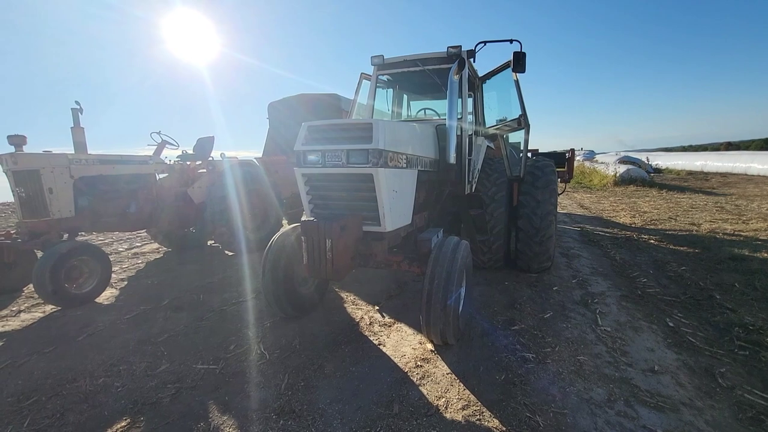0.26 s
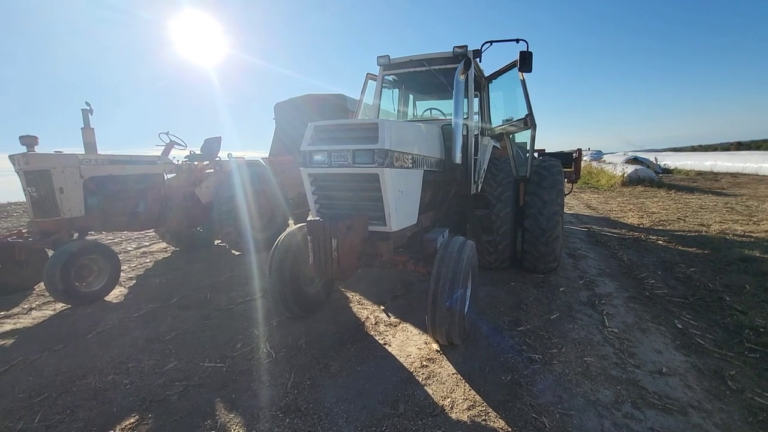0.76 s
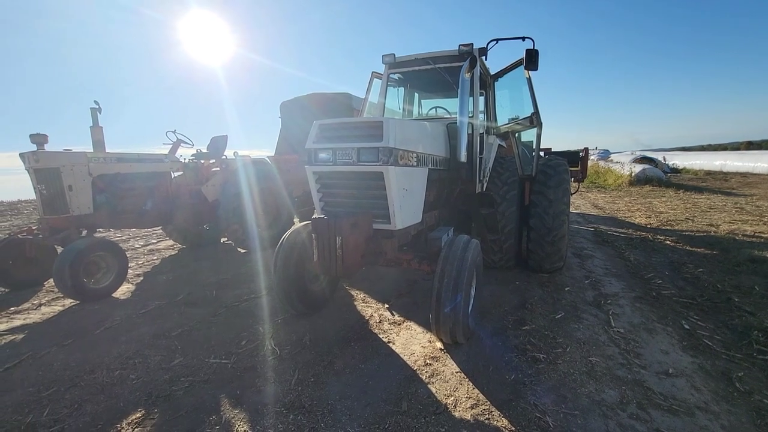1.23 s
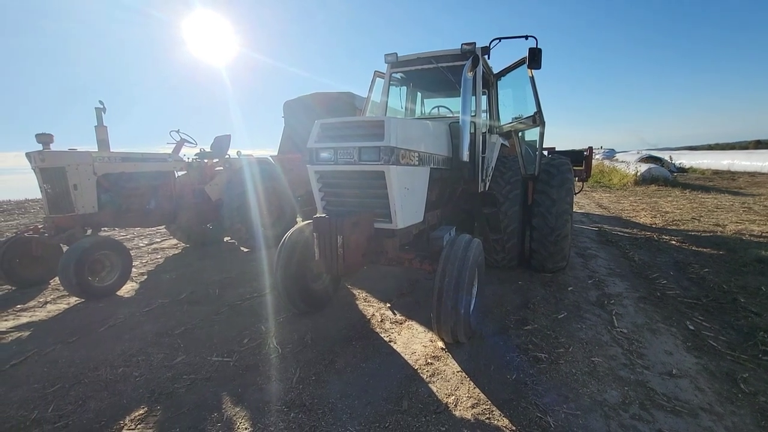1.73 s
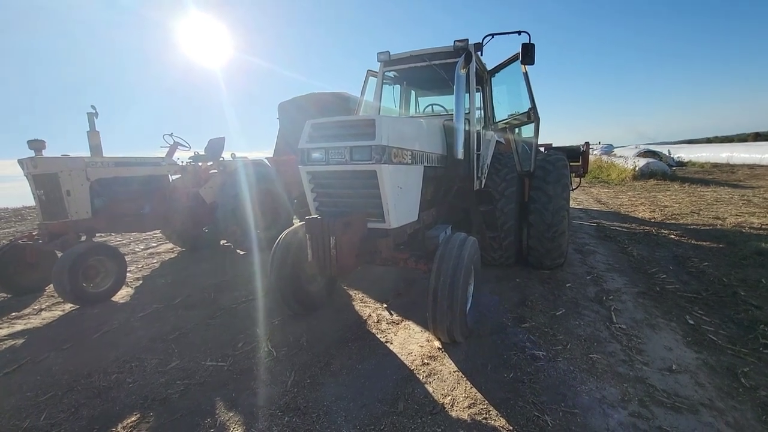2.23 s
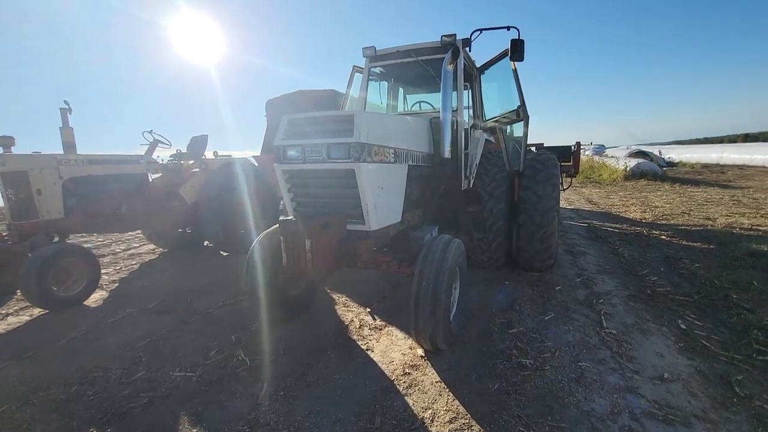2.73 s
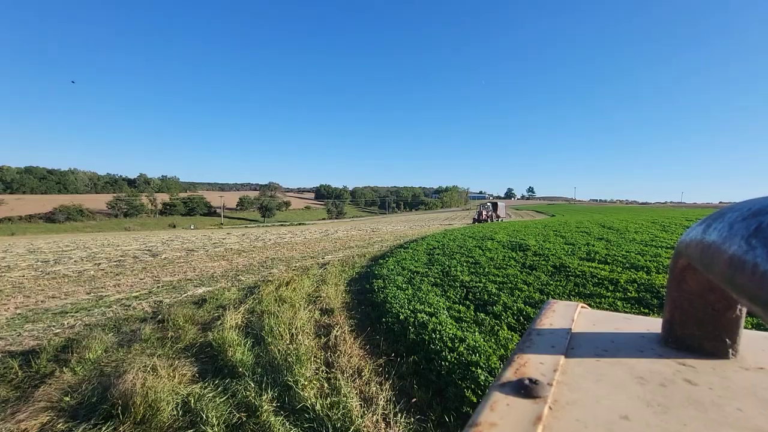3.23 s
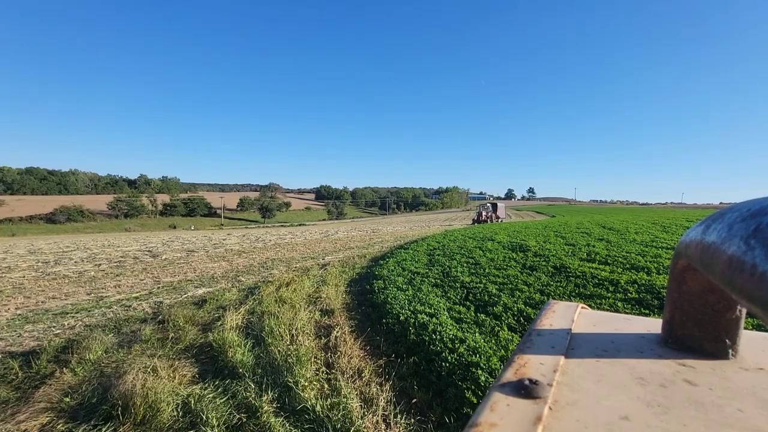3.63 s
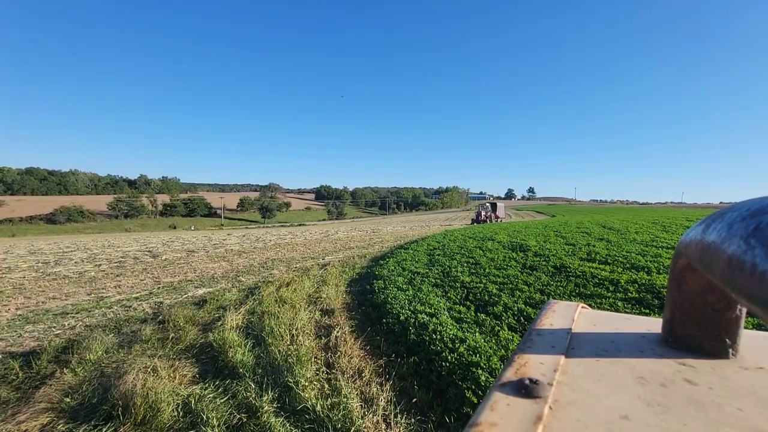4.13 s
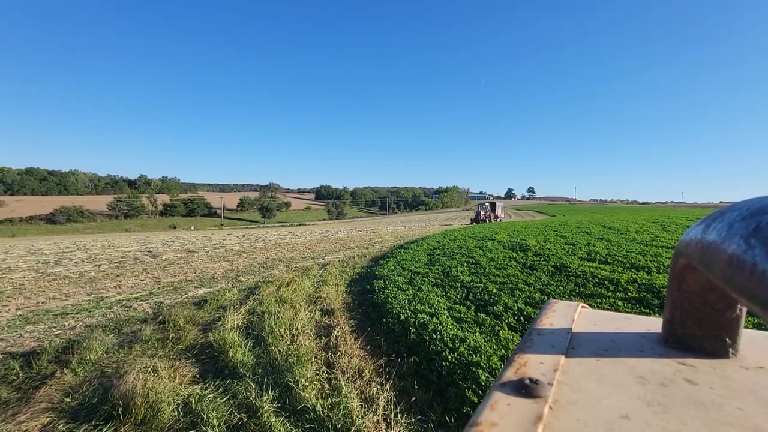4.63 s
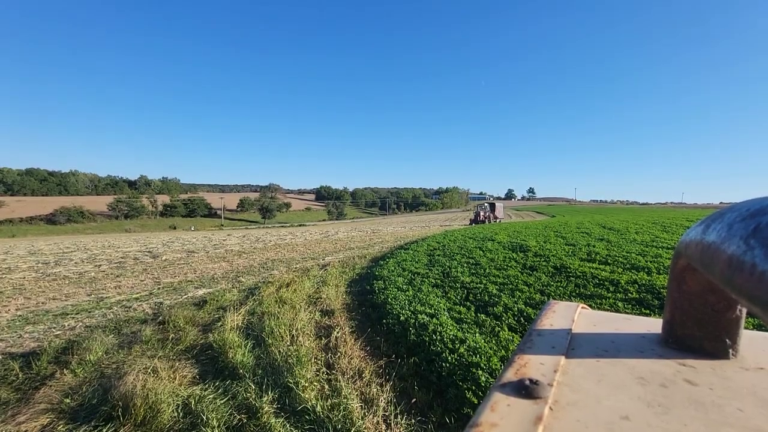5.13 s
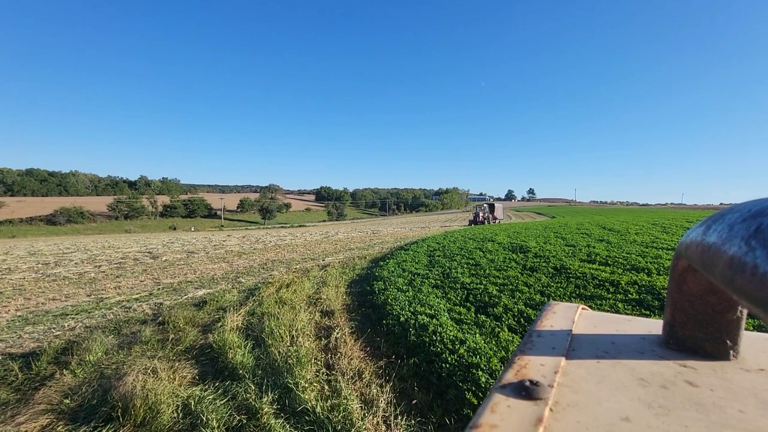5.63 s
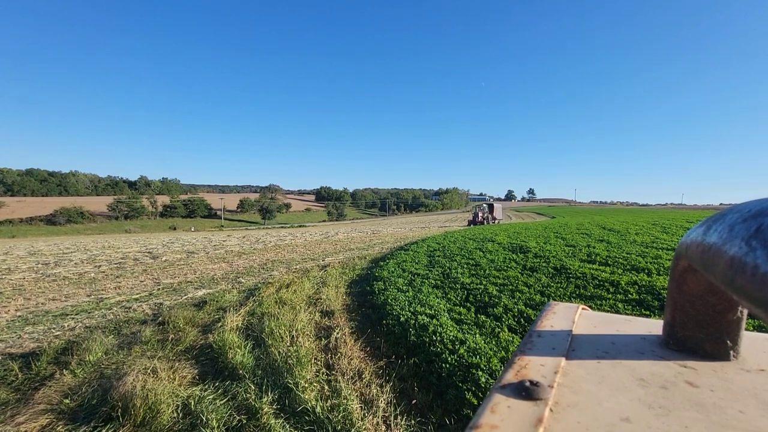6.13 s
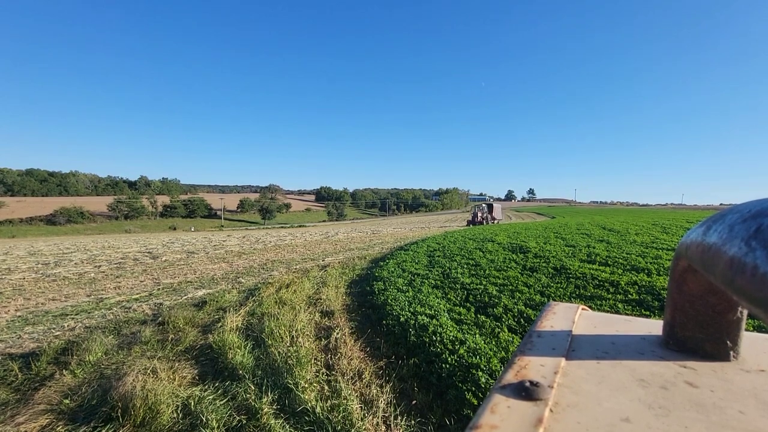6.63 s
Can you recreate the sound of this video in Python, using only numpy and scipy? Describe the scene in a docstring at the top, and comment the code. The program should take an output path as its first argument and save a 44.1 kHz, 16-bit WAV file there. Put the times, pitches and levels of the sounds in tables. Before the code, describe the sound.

In an open farmyard, a six-cylinder diesel tractor runs hard, its firings merged into a thick drone with dense metallic clatter, beside a crop blower's low paddle hum and airy rush. At about three seconds it cuts to a tiny silence, then a field: a close diesel idles with separate knocks, ticking injectors and fan noise, while a far forage chopper hums low. Wide stereo, close microphone, dry outdoors.

```python
"""A farmyard, then after a short silence a field. In the yard a six-cylinder diesel tractor at working
speed sums exhaust orders, body drone and clatter, beside a crop blower of paddle hum and rushing noise.
In the field another diesel idles close by: single firings excite body, block and injectors, knocks and
once-a-cycle chirps stand out, and its fan is shaped noise. A far forage chopper is a tone with its octave."""
import sys
import numpy as np
from scipy import signal
from scipy.fft import rfft, irfft, next_fast_len
from scipy.io import wavfile
from scipy.ndimage import map_coordinates

SR = 44100
rng = np.random.default_rng(int(sys.argv[2]) if len(sys.argv) > 2 else 0)


def dump(signal):
    """Clip the signal to [-1, 1] and save it as 16-bit WAV at the path in sys.argv[1]."""
    limited = np.clip(np.atleast_2d(signal).T, -1, 1)
    pcm = np.round(limited * 32767).astype(np.int16)
    wavfile.write(sys.argv[1], SR, pcm)


N = 302526

# When each place is heard: (start [s], end [s])
YARD_SPAN = (-1, 3.026)
FIELD_SPAN = (3.130, 8)

# Crankshaft speed, steady and then creeping up: (time [s], speed [rpm])
WORK_RPM = [(2.4, 1865.3), (3.02, 1870.4)]
IDLE_RPM = [(4.7, 773.9), (6.85, 776.6)]

# Exhaust harmonics: (multiple of the four-stroke cycle rate [1], level [dB])
WORK_ORDERS = [(6, -18), (9, -38), (10, -35), (12, -21), (14, -28), (16, -38.5), (18, -36), (20, -34.5),
               (26, -35.5), (30, -40), (32, -38), (36, -38.5), (52, -36)]
IDLE_ORDERS = [(6, -36), (9, -38), (12, -38), (15, -29.5), (17, -37), (18, -32), (19, -38), (20, -39),
               (21, -35), (24, -41), (31, -39), (38, -41), (40, -42), (51, -41)]

# Spectral envelopes of each source: (frequency [Hz], relative level [dB])
WORK_BODY = [(30, -26), (45, -17), (60, 0), (110, -2), (160, -4), (205, 3), (260, -1), (330, -4),
             (410, 0.5), (560, -7.5), (700, -13.5), (900, -23), (1500, -69)]
WORK_CLATTER = [(380, -37), (650, -13), (702, -18), (797, -6.5), (899, -6), (1030, -10), (1210, -2.5),
                (1320, -6.5), (1440, 0), (1770, -15), (2150, -6), (2390, -8.5), (2600, -18.5),
                (3040, -15.5), (3500, -20.5), (4550, -37), (7700, -120)]
BLOWER_RUSH = [(1760, -19), (3000, -2.5), (3130, -13), (3500, -9.5), (4170, -5.5), (4660, -10.5),
               (6170, -6), (7150, -10.5), (8760, -29), (9870, -33), (14200, -20.5), (15100, -21),
               (16000, -32)]
IDLE_BODY = [(25, -22), (45, -1), (120, 3), (165, -4.5), (200, 0.5), (245, 2), (285, -7.5), (330, -4),
             (400, -11), (600, -7), (900, -26), (1500, -70)]
IDLE_CLATTER = [(320, -31), (550, -5), (739, -2), (888, -4.5), (1060, 0), (1180, -4.5), (1250, 3),
                (1350, -4), (1770, -6), (2310, -18.5), (2570, -13), (3200, -12.5), (4160, -37),
                (7040, -120)]
INJECTORS = [(1530, -44), (2600, -3.5), (2760, -21), (3170, -20), (3470, -5), (3800, -7.5), (5440, 1),
             (6190, -7), (7480, -7.5), (8910, -27), (11600, -22.5), (12500, -18), (15200, -11.5),
             (16000, -22)]
IDLE_FAN = [(30, -21), (100, -5), (450, -3.5), (1200, -5), (2800, -9.5), (4300, -8), (5200, -8),
            (5650, -3.5), (6100, -14), (6800, -17.5), (7400, -12.5), (8800, -59), (15000, -32)]

# Likeness of left and right, held within 0 to 1 in use: (frequency [Hz], correlation [1])
WORK_ALIKE = [(60, 0.6), (300, 1.2), (640, 0.84), (1400, 0.7), (2400, .5), (7000, 0.23), (9500, 1.3),
              (15000, 1)]
IDLE_ALIKE = [(130, 0.52), (300, 1), (700, 0.21), (1500, 0.55), (5000, 0.2), (15000, 0.12)]
# Balance of the channels: (frequency [Hz], left minus right [dB])
WORK_BALANCE = [(300, -2), (1150, 2.5), (1450, -5.5), (1750, -4.5), (2200, -6), (3000, -7.5), (3700, -5),
                (4700, -8.5), (6500, -9), (8500, 1), (11000, 0.5), (14500, -12)]
IDLE_BALANCE = [(250, -2), (420, 2), (680, 0), (850, 3.5), (1200, -2), (1700, -5.5), (2400, -1),
                (3500, -4.5), (5300, -12.5), (7000, 0), (9500, 5), (14500, 10)]
# Phase by which the left channel leads: (frequency [Hz], phase [rad])
WORK_LEAD = [(0, 0), (1290, -0.0), (2500, 8.5), (3530, 15), (4050, 12.5), (5080, 17), (7670, 18.9),
             (16000, 18.8)]
IDLE_LEAD = [(0, 0), (1460, 4), (5170, 16.2), (8610, 30.5), (11300, 31.5), (13000, 42.6), (15000, 53.2),
             (16000, 55.5)]

# Panels and linkages sounding once a cycle: (moment [cycles], length [cycles], centre [Hz],
# width [Hz], level [dB], left minus right [dB])
WORK_PARTS = [(.03, 0.03, 430, 80, -24.5, 0), (.15, 0.088, 249, 35, -24.5, -3.5),
              (.5, 0.035, 1420, 130, -22.5, -13.5), (.86, 0.029, 2164, 200, -23, -12.5),
              (0.971, 0.059, 1170, 90, -22, -2.5)]
IDLE_PARTS = [(.05, 0.037, 703, 71, -30.5, -8.5), (.29, 0.014, 1120, 130, -17.5, -2.5),
              (.37, 0.012, 1780, 200, -25.5, -5), (.415, .016, 1100, 120, -24, -4),
              (.54, 0.044, 433, 90.5, -29, 6), (.7, 0.052, 335, 40.3, -27.5, 3),
              (.75, .045, 780, 55, -19, -1), (.855, 0.015, 4730, 170, -23, -15),
              (.87, 0.029, 5410, 200, -24, -9.5), (.94, .02, 1150, 120, -26, -4.5)]

# Crop blower: (time [s], rush level before gain [dB], paddle rate [Hz], hum level [dB])
BLOWER_COURSE = [(0, -28, 62.9, -23), (1.8, -28.5, 62.5, -25), (2.6, -27.5, 63.4, -23.5),
                 (3, -27, 63.2, -22.5)]

# Idling cylinders in firing order: (combustion [dB], injector [dB], injector t60 [s])
CYLINDERS = [(0.5, 2, 0.12), (0, 1.5, 0.16), (2, -0.5, 0.16), (-1.5, 5, .06), (2, 3.5, 0.25),
             (-2, -0.5, 0.14)]
# Ringing modes of the engine block: (frequency [Hz], relative level [dB], t60 [s])
BLOCK_MODES = [(790, -7, .06), (1060, -2, .06), (1280, -3, .05), (1470, -3, .04), (1690, 0, .04),
               (1830, -1, .045), (2090, -4, .04)]
# Two opposite knocking cylinders: (moment [cycles], level before a fixed cut [dB])
KNOCKERS = [(.195, -13), (.692, -23.5)]
# Charges that burn late and knock harder: (time [s], extra level [dB])
HARD_BURNS = [(4.265, 4.5), (4.496, 11), (5.272, 10.5), (6.279, 4.5)]

# Firing note of the far chopper, sagging as it takes on crop: (time [s], pitch [Hz])
CHOPPER_PITCH = [(3.15, 102.9), (4.23, 102.9), (4.33, 101.5), (6.85, 101.6)]

IDLE_LAG_S = .0005  # right channel behind left, for the knocks and once-a-cycle parts
KNOCK_SCATTER_DB = 1.6  # spread of ordinary knocks
CRACK_T60_S = 0.028  # noisy edge of a knock
SLAP_DELAY_S, SLAP_DB = 0.016, -15  # nominal delay of the piston slap, level relative to its knock
CHOPPER_DB, OCTAVE_DB = -19, -24.5  # mean level, and octave relative to the firing note
AIR_SWELL_DB, AIR_KNOTS_PER_S = 1.5, 7  # swelling in the moving air
TOP_HZ = 15950  # upper band limit


def amp(db):
    """Amplitude ratio: twenty decibels per factor of ten."""
    return 10 ** (np.asarray(db) / 20)


def unit(x):
    """Normalization to a root-mean-square value of 1."""
    return x / np.sqrt(np.mean(x ** 2) + 1e-20)


def along(points, hz):
    """Interpolation of a spectral table along a logarithmic frequency axis."""
    f, v = np.transpose(points)
    return np.interp(np.log(hz + 1), np.log(f + 1), v)


def curves(rows):
    """Linear interpolation in time, giving one curve for each column after the first."""
    s, *cols = np.transpose(rows)
    return [np.interp(np.arange(N) / SR, s, c) for c in cols]


def wobble(rate):
    """Slow random modulation: a smooth curve through random knots, rate of them a second."""
    knots = rng.standard_normal(int(N * rate / SR) + 4)
    return map_coordinates(knots, [np.arange(N) * rate / SR])


def filtered(x, response):
    """Linear filtering: the spectrum is multiplied by a frequency response."""
    m = next_fast_len(N + SR // 4)
    return irfft(rfft(x, m) * response(np.fft.rfftfreq(m, 1 / SR)), m)[..., :N]


def placed(pair, spectrum, alike, balance, lead):
    """Stereo placement: sum and difference of two unrelated signals set the correlation of the ears."""
    m = next_fast_len(N + SR // 4)
    hz = np.fft.rfftfreq(m, 1 / SR)
    turn = np.arccos(np.clip(along(alike, hz), 0, 1)) / 2
    coloured = rfft(pair, m) * amp(along(spectrum, hz))
    mid, side = coloured * [np.ones_like(hz), np.tan(turn)]
    lean = amp(np.outer([.5, -.5], along(balance, hz)))
    lean = lean / np.hypot(*lean)  # equal total power at every balance
    phase = np.exp(1j * np.outer([.5, -.5], np.interp(hz, *np.transpose(lead))))
    ears = irfft(np.array([mid + side, mid - side]) * lean * phase, m)[:, :N]
    return unit(ears)


def cycles(rpm, start):
    """Four-stroke kinematics: one cycle per two crankshaft turns, counted from the time start."""
    count = np.cumsum(curves(rpm)[0]) / (2 * 60 * SR)
    return count - count[round(start * SR)]


def passes(cycle, moment):
    """Phase crossings: the samples at which the engine passes a given moment of its cycle."""
    return np.flatnonzero(np.diff(np.floor(cycle - moment)))


def exhaust(cycle, orders, waver_db):
    """Harmonic radiation of the exhaust pipe: wavering sinusoids locked to the crankshaft."""
    notes = np.zeros(N)
    for order, db in orders:
        level = amp(db + waver_db * wobble(5.84))
        phase = 2 * np.pi * (round(order) * cycle + rng.random())
        notes += level * np.sqrt(2) * np.sin(phase)
    return notes


def firings(cycle, level_db, t60, attack, scatter_db):
    """Impulsive excitation: cylinders fire in turn, and the power of their decaying blows adds."""
    t, power = np.arange(SR // 4) / SR, np.zeros(N)
    for k, (db, life) in enumerate(zip(level_db, t60)):
        at = passes(cycle, k / len(level_db))
        blows = np.zeros(N)
        blows[at] = amp(db + scatter_db * rng.standard_normal(len(at))) ** 2
        decay = amp(-60 * t / life) * (1 - np.exp(-t / attack))
        power += signal.oaconvolve(blows, decay ** 2)[:N]
    return unit(np.sqrt(np.abs(power)))


def rattle(cycle, repeat, jitter):
    """Cyclostationary noise: the power share repeat recurs each cycle, its timing wandering by jitter [s]."""
    length = round(N / (cycle[-1] - cycle[0]))
    place = cycle * length + jitter * SR * wobble(80)
    rings = rng.standard_normal((2, length))
    same = [map_coordinates(ring, [place % length], mode="grid-wrap") for ring in rings]
    share = np.clip(repeat, 0, 1)
    return np.sqrt(share) * np.array(same) + np.sqrt(1 - share) * rng.standard_normal((2, N))


def parts(cycle, table, lag):
    """Resonance of panels and linkages: narrow bands buzz or chirp at set moments of every cycle."""
    shake, out = rattle(cycle, repeat=0.76, jitter=.00003)[0], np.zeros((2, N))
    for moment, length, centre_hz, width_hz, db, pan_db in table:
        ring = filtered(shake, lambda hz: np.exp(-.5 * ((hz - centre_hz) / width_hz) ** 2))
        distance = (cycle - moment + .5) % 1 - .5  # from the nearest such moment
        swell = np.exp(-.5 * (distance / length) ** 2)
        burst = unit(ring * swell) * np.sqrt(np.mean(swell ** 2))
        out += amp(db + np.array([[.5], [-.5]]) * pan_db) * burst
    return np.array([out[0], np.roll(out[1], round(lag * SR))])


def working_tractor():
    """Fusion of rapid impulses: at speed the firings merge into a drone under dense, hard clatter."""
    cycle = cycles(WORK_RPM, 0)
    place = (WORK_ALIKE, WORK_BALANCE, WORK_LEAD)
    blows = firings(cycle, np.zeros(6), np.full(6, .08), attack=0.0018, scatter_db=0.2)
    drone = blows * rattle(cycle, repeat=0.38, jitter=.0001)
    body = amp(-21.0) * placed(drone, WORK_BODY, *place)
    clank = blows * rattle(cycle, repeat=.82, jitter=.00003)
    clatter = amp(-19) * placed(clank, WORK_CLATTER, *place)
    return exhaust(cycle, WORK_ORDERS, waver_db=1.13) + body + clatter + parts(cycle, WORK_PARTS, 0)


def blower():
    """Rotor noise: paddles hum at their passing rate and throw a turbulent rush of air and crop."""
    rush_db, paddle_hz, hum_db = curves(BLOWER_COURSE)
    air = amp(0.82 * wobble(120)) * rng.standard_normal((2, N))
    rush = amp(rush_db + 2) * placed(air, BLOWER_RUSH, WORK_ALIKE, WORK_BALANCE, WORK_LEAD)
    phase = 2 * np.pi * np.cumsum(paddle_hz) / SR
    hum = np.sqrt(2) * amp(hum_db + .4 * wobble(5)) * np.sin(phase)
    return rush + hum


def knocks(cycle):
    """Modal response to shock: hard and faint knocks ring the block, each followed by a piston slap."""
    t, out = np.arange(SR // 8) / SR, np.zeros(N + SR)
    phases = rng.uniform(0, 2 * np.pi, len(BLOCK_MODES))
    dull = signal.butter(4, [850, 2150], "bandpass", fs=SR)
    for moment, level_db in KNOCKERS:
        for at in passes(cycle, moment):
            extra_db = sum(db for s, db in HARD_BURNS if abs(s - at / SR) < .03)
            scatter_db = KNOCK_SCATTER_DB * rng.standard_normal()
            ring = np.zeros(len(t))
            for (hz, db, t60), phase in zip(BLOCK_MODES, phases):
                decay = amp(db + 2 * rng.standard_normal() - 60 * t / t60)
                ring += decay * np.sin(2 * np.pi * hz * t + phase + .5 * rng.standard_normal())
            noise = signal.lfilter(*dull, rng.standard_normal(len(t)))
            crack = 4 * amp(-60 * t / CRACK_T60_S) * noise
            shape = unit((ring + crack) * (1 - np.exp(-t / .0005)))
            # a hard burn takes its set excess in place of the random scatter
            blow = amp(level_db + (extra_db or scatter_db) - 16) * shape
            out[at:][:len(t)] += blow
            slap = at + round(SLAP_DELAY_S * rng.uniform(0.71, 1.4) * SR)
            out[slap:][:len(t)] += amp(SLAP_DB) * blow
    return np.array([out, np.roll(out, round(IDLE_LAG_S * SR))])[:, :N] * amp([[-2], [2]])


def idling_tractor():
    """Resolved impulses: at idle each firing clanks the block and sizzles at the injector, over fan noise."""
    cycle = cycles(IDLE_RPM, 3.149)
    place = (IDLE_ALIKE, IDLE_BALANCE, IDLE_LEAD)
    burn_db, tick_db, tick_t60 = np.transpose(CYLINDERS)
    burns = firings(cycle, burn_db, np.full(6, .12), attack=0.0069, scatter_db=1.6)
    ticks = firings(cycle, tick_db, tick_t60, attack=0.0013, scatter_db=2.06)
    throb = (1 + 0.5 * burns) * rattle(cycle, repeat=0.9, jitter=.0001)
    body = amp(-25.5) * placed(throb, IDLE_BODY, *place)
    clank = burns * rattle(cycle, repeat=0.66, jitter=.00004)
    clatter = amp(-23.5) * placed(clank, IDLE_CLATTER, *place)
    sizzle = ticks * rattle(cycle, repeat=.35, jitter=.00003)
    injectors = amp(-25.5) * placed(sizzle, INJECTORS, *place)
    fan = amp(-24.5) * placed(rng.standard_normal((2, N)), IDLE_FAN, *place)
    metal = clatter + injectors + parts(cycle, IDLE_PARTS, IDLE_LAG_S) + knocks(cycle)
    return exhaust(cycle, IDLE_ORDERS, waver_db=0.5) + body + metal + fan


def far_chopper():
    """Propagation through moving air: only the firing note and its octave carry, swelling and fading."""
    phase = 2 * np.pi * np.cumsum(curves(CHOPPER_PITCH)[0]) / SR
    level = amp(CHOPPER_DB + AIR_SWELL_DB * wobble(AIR_KNOTS_PER_S))
    return np.sqrt(2) * level * (np.sin(phase) + amp(OCTAVE_DB) * np.sin(2 * phase))


def gate(span, fade):
    """Amplitude gating: a gain with linear ramps, fade [s] long and centred on the ends of the span."""
    t = np.arange(N) / SR
    return np.clip(np.minimum(t - span[0], span[1] - t) / fade + .5, 0, 1)


def scene():
    """Superposition of sources: the yard, a short silence, the field."""
    yard = working_tractor() + blower()
    field = idling_tractor() + far_chopper()
    return gate(YARD_SPAN, fade=.002) * yard + gate(FIELD_SPAN, fade=0.0052) * field


def record(dry):
    """Saturation and band limiting: the highest peaks are rounded and a steep low-pass ends the treble."""
    held = dry / (1 + np.abs(dry) ** 8) ** (1 / 8)
    return filtered(held, lambda hz: 1 / (1 + (hz / TOP_HZ) ** 200))


dry = scene()
out = record(dry)
dump(out)
```